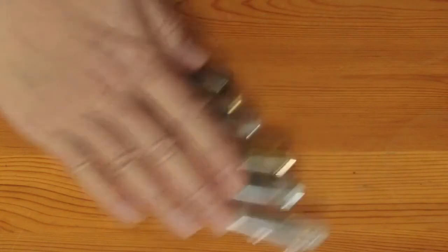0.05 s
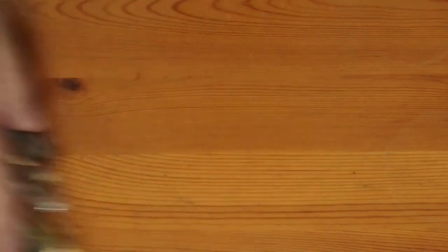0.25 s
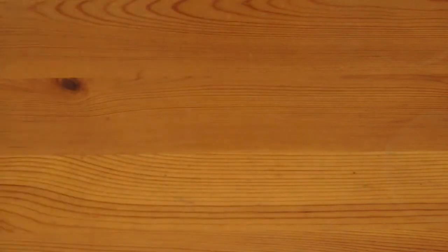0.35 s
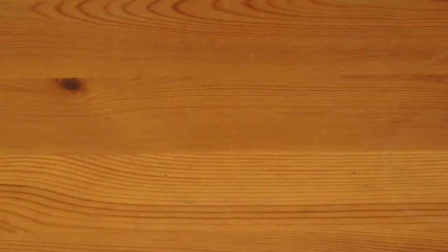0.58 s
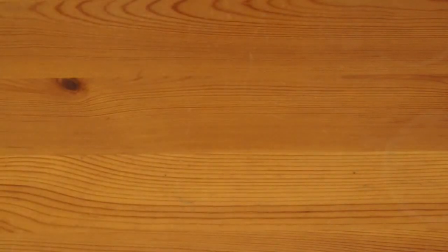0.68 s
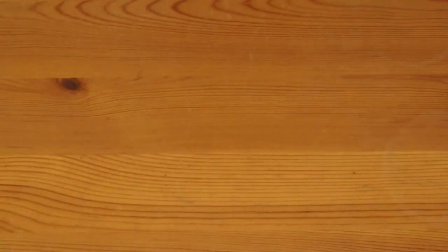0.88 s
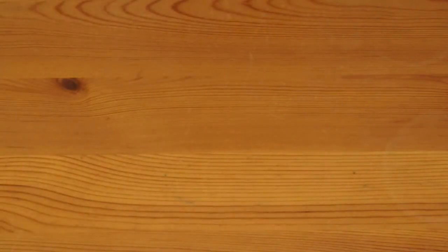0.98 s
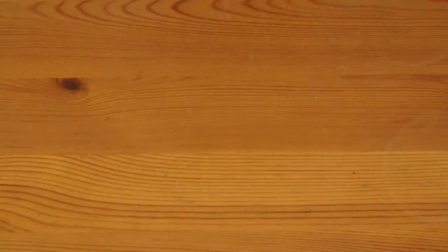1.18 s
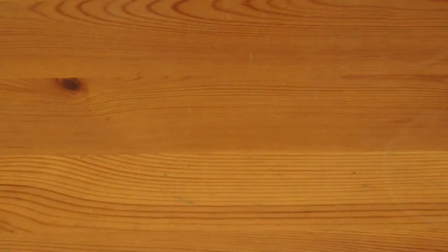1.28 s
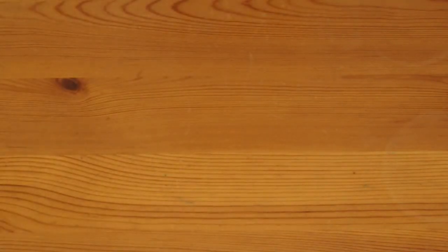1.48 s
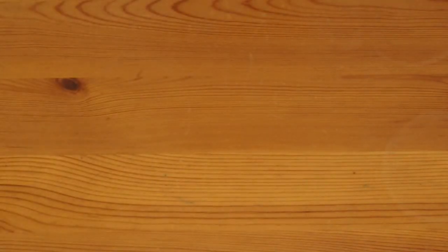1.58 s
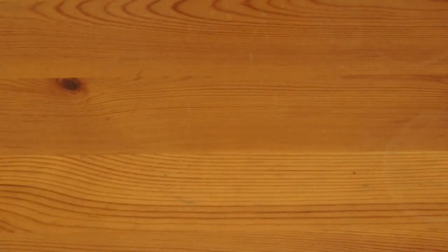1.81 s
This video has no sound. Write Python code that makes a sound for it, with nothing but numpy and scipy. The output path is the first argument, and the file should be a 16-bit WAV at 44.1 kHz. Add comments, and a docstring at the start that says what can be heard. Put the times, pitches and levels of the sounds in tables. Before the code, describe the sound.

Hard plastic pens slide across a wooden table with a hollow, raspy scrape, clatter together in a quick burst of clicks, then settle with faint taps; close stereo microphone in a small quiet room.

```python
"""In a small room, close by, a hand sweeps a row of plastic pens across a wooden table.
Dense random slips ring filters for tabletop drone, barrel rasp and hiss; sparser jolts add scratches.
Bunching pens click and rattle: sharp contacts with short noise tails and ringing notes, or random impulses.
Decaying sines make the settling knocks, pen rings and hand bumps; shaped noise makes the room tone."""
import sys
import numpy as np
from scipy import signal
from scipy.fft import rfft, irfft, next_fast_len
from scipy.io import wavfile
from scipy.ndimage import uniform_filter1d, map_coordinates

SR = 44100
rng = np.random.default_rng(int(sys.argv[2]) if len(sys.argv) > 2 else 0)


def generate_wav(sig):
    """Save sig (samples, or channels by samples) to the path in sys.argv[1] as 16-bit PCM at SR."""
    pcm = np.round(np.clip(np.atleast_2d(sig).T, -1, 1) * 32767).astype(np.int16)
    wavfile.write(sys.argv[1], SR, pcm)


N = 81585

# Higher tabletop modes. Each row: centre in Hz, width in Hz, gain in dB before colouring.
TABLETOP_MODES = [(360, 31, -4.5), (439.3, 48, -2.5), (487.7, 26, -1.5), (562, 32, -1.5), (655.4, 46, -1.5),
                  (755.8, 22, 2), (879, 30, 2), (928.4, 14, 1.5), (1004.6, 38, -2), (1094.4, 34, -0.5),
                  (1219, 112, -1), (1255, 37, -1), (1352, 20, -2)]
# Colour of the barrels' rasp. Each row: frequency in Hz, gain in dB.
RASP_COLOUR = [(60, -16), (200, -14.5), (700, -6.5), (1300, 0), (1900, -2), (2600, 2.5), (3500, -1.5),
               (5000, -0.5), (7000, -11.5), (11000, -43.5)]
CLICK_ROOM_DB, KNOCK_ROOM_DB = -10, -20
TAP_ATTACK_S = 0.004  # time constant, knocks and pings


def amp(db):
    """Decibels to gain."""
    return 10 ** (np.asarray(db) / 20)


def unit(x):
    """Scale to rms 1."""
    return x / np.sqrt(np.mean(x ** 2) + 1e-20)


def seconds(length):
    """Time axis in seconds for a length in samples."""
    return np.arange(length) / SR


def grid():
    """Frequencies in Hz on which all full-length filters are drawn."""
    return np.fft.rfftfreq(2 * next_fast_len(N), 1 / SR)


def along(points, hz):
    """Read (Hz, value) points on a log frequency axis."""
    f, v = np.transpose(points)
    return np.interp(np.log(hz + 1), np.log(f + 1), v)


def envelope(points, left=None):
    """Gain over time from (s, dB) points; left is the dB ahead of the first."""
    return amp(np.interp(seconds(N), *np.transpose(points), left=left))


def filtered(x, response):
    """Apply a frequency response."""
    return irfft(rfft(x, 2 * next_fast_len(N)) * response)[..., :N]


def colour(points):
    """Minimum-phase response with the given (Hz, dB) shape, by folding the cepstrum."""
    cepstrum = irfft(np.log(amp(along(points, grid()))))
    half = len(cepstrum) // 2
    cepstrum[1:half] *= 2
    cepstrum[half + 1:] = 0
    return np.exp(rfft(cepstrum))


def resonances(modes, ratio):
    """Sum of band-pass modes, mode k weighted by ratio ** k; a negative ratio alternates polarity."""
    f = grid()
    total = 0
    for k, (centre, width, db) in enumerate(modes):
        damping = 1j * f * width
        total = total + ratio ** k * amp(db) * damping / (centre ** 2 - f ** 2 + damping)
    return total


def spread(pair, likeness):
    """Mix two unrelated signals into left and right with correlation given as (Hz, 0-1)."""
    turn = np.arccos(np.clip(along(likeness, grid()), -1, 1)) / 2
    mid, side = filtered(pair, np.array([np.cos(turn), np.sin(turn)]))
    return np.array([mid + side, mid - side])


def wobble(knots_per_s):
    """Smooth random curve through normally distributed knots."""
    return map_coordinates(rng.standard_normal(1024), [np.arange(N) * knots_per_s / SR], mode="wrap")


def add(track, s, sound):
    """Add a sound into the track at s seconds."""
    part = track[..., round(s * SR):][..., :sound.shape[-1]]
    part += sound[..., :part.shape[-1]]


def room(x):
    """Diffuse reverberation: decaying noise, independent left and right, faster or slower by frequency."""
    # Each row: frequency in Hz, t60 in s.
    decay = [(150, 0.12), (1000, 0.52), (4000, 0.17), (14000, .16)]
    hz, t, z = signal.stft(rng.standard_normal((2, SR // 2)), SR, nperseg=256)
    fade = amp(-60 * t / along(decay, hz)[:, None])
    tail = signal.istft(z * fade, SR, nperseg=256)[1]
    tail = tail / np.linalg.norm(tail[0])
    return signal.fftconvolve(np.atleast_2d(x), tail, axes=1)[:, :N]


def friction(response, judder_db):
    """Dense tiny slips of random size ring a body; their level judders. Output rms is 1."""
    # Left-right correlation. Each row: frequency in Hz, correlation 0-1.
    likeness = [(40, .5), (200, .93), (500, .9), (1000, .89), (3000, .84), (6000, .62), (12000, .3)]
    # Lean to the left. Each row: frequency in Hz, left over right in dB.
    lean = [(250, -1.9), (550, 0.94), (1200, 0.23), (3500, -1), (8000, 2), (13000, 1.5)]
    slips_per_s, slip_spread_db = 14000, 2.5
    size_db = slip_spread_db * rng.standard_normal(N) + judder_db * wobble(140)
    slips = (rng.random(N) < slips_per_s / SR) * amp(size_db)
    sound = filtered(spread(slips * rng.standard_normal((2, N)), likeness), response)
    half_lean_db = along(lean, grid()) / 2
    return unit(filtered(sound, amp([half_lean_db, -half_lean_db])))


def patchy(x):
    """Resonances come and go as pens turn under the hand: random gain over time and frequency, rms 1."""
    patch_db = 3.2  # rms
    z = signal.stft(x, nperseg=512)[2]
    field = rng.standard_normal(z.shape[1:])
    field = uniform_filter1d(field, size=3, axis=0)  # frequency bins
    field = uniform_filter1d(field, size=10, axis=1)  # time frames
    return unit(signal.istft(z * amp(patch_db * unit(field)), nperseg=512)[1][:, :N])


def room_tone():
    """Faint steady hiss over a rumble that drifts unevenly, both from shaped stereo noise."""
    # Each row: frequency in Hz, gain in dB.
    tone_colour = [(25, -28), (55, -7.5), (90, -2.5), (125, 4), (175, -8), (240, -6.5), (350, -9.5),
                   (600, -13), (1000, -12), (2000, -18), (4300, -17.5), (8000, -25), (15000, -21)]
    tone_db, drift_db = -60.5, 2
    likeness = [(30, 0.52), (120, 0.79), (600, 0.34), (4000, 0.023)]
    air = spread(rng.standard_normal((2, N)), likeness)
    tone = unit(filtered(air, colour(tone_colour)))
    rumble = filtered(tone, 1 / (1 + (grid() / 1500) ** 2))
    hiss = tone - rumble
    return amp(tone_db) * (hiss + rumble * amp(drift_db * (wobble(9) - .5)))


def bumps():
    """The hand pushes the table into a short low thud: one decaying sine per bump."""
    # Each row: start in seconds, level in dB.
    bump_times = [(0.619, -33.5), (0.698, -44), (0.749, -47), (1.162, -53)]
    bump_hz, t60_s = 116, 0.062
    out, t = np.zeros(N), seconds(SR // 4)
    for s, db in bump_times:
        add(out, s, amp(db - 60 * t / t60_s) * np.sin(2 * np.pi * bump_hz * t))
    return out


def knocks():
    """A rocking pen taps the tabletop: decaying modes, randomly detuned and weighted per tap."""
    # Each row: start in seconds, gain in dB.
    knock_times = [(.648, -26), (.706, -22.5), (.850, -33.5), (0.929, -38.5), (.962, -40.5), (1.007, -37.5),
                   (1.060, -36), (1.124, -31.5), (1.153, -28.5), (1.248, -23.5), (1.270, -25.5),
                   (1.328, -32), (1.340, -33)]
    # Each row: frequency in Hz, level in dB, t60 in s.
    knock_modes = [(265, -14.5, 0.051), (418, -16, 0.026), (540.2, 3, 0.049), (592, -10.5, 0.041),
                   (793, -29, 0.039), (1229, -13.5, 0.042), (1728, -17, 0.046)]
    detune, level_spread_db = 0.015, 2.16  # standard deviations, detune as a fraction
    out, t = np.zeros(N), seconds(SR // 5)
    attack = (1 - np.exp(-t / TAP_ATTACK_S)) ** 2
    for s, db in knock_times:
        ring = np.zeros(len(t))
        for hz, level_db, t60_s in knock_modes:
            decay = amp(level_db + rng.normal(0, level_spread_db) - 60 * t / t60_s)
            ring += decay * np.sin(2 * np.pi * hz * (1 + detune * rng.normal()) * t)
        add(out, s, amp(db) * ring * attack)
    direct = out * amp([[1], [-1]])  # leans 2 dB to the left
    return direct + amp(KNOCK_ROOM_DB) * room(out)


def pings():
    """A barrel free of the hand rings on after a contact: decaying modes at random phase."""
    # Each row: start in seconds, gain in dB.
    ping_times = [(0.845, -38), (1.007, -47), (1.177, -43)]
    # Each row: frequency in Hz, level in dB, t60 in s.
    pen_modes = [(387, 0, 0.072), (798, 2, 0.062), (1235, -5, 0.11), (1667, -0.5, 0.066),
                 (2000, -15, 0.072), (4030, 1.5, 0.042), (8200, -14.5, .07)]
    out, t = np.zeros(N), seconds(SR // 5)
    attack = 1 - np.exp(-t / TAP_ATTACK_S)
    for s, db in ping_times:
        ring = np.zeros(len(t))
        for hz, level_db, t60_s in pen_modes:
            decay = amp(level_db + rng.normal() - 60 * t / t60_s)
            ring += decay * np.sin(2 * np.pi * (hz * t + rng.random()))
        add(out, s, amp(db) * ring * attack)
    return out + amp(KNOCK_ROOM_DB) * room(out)


def rattle(plastic):
    """Clusters of small random contacts between bunched pens and wood: impulses through both bodies."""
    # Each row: first second, last second, gain in dB.
    clusters = [(0.639, 0.742, -16), (0.784, 0.853, -27), (1.166, 1.197, -30.5), (1.249, 1.297, -42)]
    # Each row: frequency in Hz, gain in dB.
    rattle_colour = [(100, -28), (600, -3), (1800, 3.5), (4000, -3), (8000, -8.5), (15000, -32)]
    hits_per_s, spread_db = 350, 3.5
    hits = np.zeros((2, N))
    for first, last, db in clusters:
        for s in np.arange(first, last, 1 / hits_per_s):
            late, size, place, push = rng.uniform(-1, 1, size=4)
            gain = np.sign(push) * amp(db + spread_db * size)
            pan = 1 + place * np.array([[.5], [-.5]])
            add(hits, s + late / hits_per_s, gain * pan)
    wood = 1 + resonances(TABLETOP_MODES, -1.105)
    out = filtered(hits, plastic * wood * colour(rattle_colour))
    return out + amp(CLICK_ROOM_DB) * room(out)


def clicks(plastic):
    """Pens collide: a sharp contact, milliseconds of noisy chatter and one briefly ringing note."""
    # Each row: start in seconds, contact gain in dB at the four click bands ahead of the barrel modes,
    # left over right in dB, note in Hz, note level in dB.
    collisions = [(0.5455, -15, -7, -8.5, -41, 0, 3514, -9), (0.5484, -11, -9, -1.5, -20, 7.5, 8300, -23),
                  (.6030, -28, -16, -30, -25, 13, 4500, -25), (0.6107, -14, -9, -11, -7, 5.5, 12900, -38),
                  (0.6128, -22, -10, -27, -31, -7, 4920, -27),
                  (0.6342, -12, -12, -13, -11, 7.5, 13000, -16.5),
                  (0.64, -17, -15.5, -7, -15, 5, 7800, -28),
                  (0.6462, -7, -11.5, -17.5, -16, 0, 7570, -23.5),
                  (0.6961, -35, -12.5, -14.5, -20, 5, 12900, -27),
                  (0.7065, -3, -16.5, -29, -38, -1, 1710, -21), (0.7263, -4, -14.5, -40, -53, 1, 1720, -22),
                  (0.7595, -9, -7.5, -6.5, -20, 3, 4570, -25),
                  (1.1448, -26, -25, -28.5, -48, 5.5, 2370, -32),
                  (1.1676, -41, -25, -43, -33, 12, 1842, -37.5), (1.1820, -28, -24, -38, -42, 0, 1990, -33),
                  (1.1758, -19, -21.5, -23.5, -32, 5.5, 3970, -26),
                  (1.1790, -41, -13.5, -24.5, -55, 3, 1810, -24.5),
                  (1.1988, -48, -26, -33, -51, -1, 3860, -49), (1.2466, -11.5, -34, -55, -55, 2, 1750, -29),
                  (1.2604, -24, -28, -33, -48, 2, 3800, -48),
                  (1.2757, -16.5, -45, -33.5, -63, 5.5, 6260, -42),
                  (1.342, -38, -37.5, -44.5, -70, -1, 5730, -50)]
    bands_hz = (1000, 3500, 8000, 13000)  # the four click bands in Hz
    chatter_gain, chatter_t60_s, ring_t60_s = 2.12, 0.016, 0.013
    width, dispersion_s, note_room_db = 1.2, 0.000874, -18.5
    hits, notes, t = np.zeros((2, N)), np.zeros((2, N)), seconds(SR // 20)
    for s, *bands_db, pan_db, note_hz, note_db in collisions:
        pan = amp([[pan_db / 2], [-pan_db / 2]])
        chatter = rng.standard_normal((2, len(t))) * amp(-60 * t / chatter_t60_s)
        contact = chatter_gain * chatter / np.linalg.norm(chatter[0])  # rows: mid, side
        contact[0, 0] += 1
        lows = [(60, bands_db[0] - 42), (300, bands_db[0] - 10)]
        shape = [*lows, *zip(bands_hz, bands_db), (16000, bands_db[-1] - 5)]
        impulse = irfft(colour(shape))[None, :len(t)]
        mid, side = signal.fftconvolve(contact, impulse, axes=1)
        side = width * np.diff(side, prepend=0) / 2  # sides differ mostly in the treble
        add(hits, s, pan * np.array([mid + side, mid - side]))
        attack = (1 - np.exp(-note_hz * t)) ** 2
        note = amp(note_db - 60 * t / ring_t60_s) * np.sin(2 * np.pi * note_hz * t) * attack
        add(notes, s, pan * note)
    # bending waves: lows arrive later
    dispersion = np.exp(-2j * np.pi * dispersion_s * grid() * (1 - grid() / SR))
    out = filtered(hits, plastic * dispersion)
    return out + notes + room(amp(CLICK_ROOM_DB) * out + amp(note_room_db) * notes)


def drag():
    """Sustained rubbing excites the tabletop's hollow middle modes near 540 Hz."""
    # Each row: time in seconds, level in dB.
    drag_level = [(.42, -70), (.5, -36), (0.601, -31.5), (.7, -35.5), (.8, -59.5), (.92, -56.5), (1.0, -77),
                  (1.1, -57), (1.17, -44.5), (1.22, -56), (1.27, -43), (1.31, -75), (1.38, -99)]
    # Each row: centre in Hz, width in Hz, gain in dB before colouring.
    drag_modes = [(514.2, 21, -6), (547, 15, -0.5)]
    # Each row: frequency in Hz, gain in dB.
    drag_colour = [(200, -31.5), (450, -2), (620, -3.5), (1400, -25)]
    body = resonances(drag_modes, -0.91) * colour(drag_colour)
    return envelope(drag_level, left=-120) * friction(body, judder_db=2.5)


def free_slide():
    """Before they bunch up, loosely held barrels ring brightly as they rub."""
    # Each row: time in seconds, level in dB.
    slide_level = [(.1, -75), (.17, -52), (.225, -42), (.28, -40), (.38, -45), (.5, -56), (.6, -90)]
    # Each row: centre in Hz, width in Hz, gain in dB before colouring.
    free_modes = [(1910, 60, -14.5), (3436, 89, 5), (3720, 38, 4), (4440, 120, -3)]
    body = resonances(free_modes, 1) * colour(RASP_COLOUR)
    return envelope(slide_level) * patchy(friction(body, judder_db=0.0))


def catches(plastic):
    """Pens catch on the grain: separate scratches jolt wood and barrel at once. Output rms is 1."""
    # Each row: frequency in Hz, gain in dB.
    catch_colour = [(150, -23), (500, -4.5), (1000, 1.5), (3000, -2), (5500, -2), (15000, -33)]
    catches_per_s, spread_db = 330, 4
    size = amp(spread_db * np.clip(rng.standard_normal(N), -2, 1))
    jolts = (rng.random(N) < catches_per_s / SR) * size * np.sign(rng.standard_normal(N))
    place = rng.random(N) - .5
    body = plastic * (1 + resonances(TABLETOP_MODES, -1.07)) * colour(catch_colour)
    return unit(filtered(jolts * np.array([1 + place, 1 - place]), body))


def scrape(plastic):
    """Sliding pens drive the tabletop's boom and drone, rasp in their barrels and hiss at the contact."""
    # Each row: time in seconds, drone level in dB, rasp reference level in dB, hiss level in dB.
    sweep = [(0, -64, -69.5, -85), (0.108, -70, -76, -75), (0.161, -45, -59.5, -59.5),
             (.195, -42.5, -48, -59), (0.254, -36, -39.5, -48.5), (.39, -34, -40, -40),
             (.45, -29.5, -36, -40.5), (0.522, -30.5, -36, -39), (0.592, -30.5, -42, -45),
             (.645, -33, -36.5, -46), (0.689, -37.5, -41.5, -39.5), (0.734, -37, -49.5, -72),
             (0.791, -44, -42, -45.5), (.82, -52, -54.5, -55.5), (.86, -51.5, -49, -67),
             (0.899, -54.5, -59, -61.5), (.99, -65, -71.5, -77), (1.089, -59, -65.5, -70),
             (1.14, -50, -60.5, -62), (1.181, -43.5, -48.5, -78), (1.223, -58.5, -60, -66),
             (1.269, -47, -52.5, -64), (1.31, -55.5, -61, -70), (1.38, -84, -68, -81),
             (1.6, -85, -101, -100)]
    # Level of the lowest modes. Each row: time in seconds, level in dB.
    boom_level = [(.1, -70), (.16, -56.5), (.2, -47), (.245, -33), (.3, -38.5), (.41, -41), (.5, -38.5),
                  (.63, -35.5), (.71, -34), (.76, -49), (.82, -58), (.86, -58.5), (.99, -64.5), (1.1, -74),
                  (1.14, -45.5), (1.21, -59), (1.27, -54.5), (1.37, -76), (1.5, -63.5), (1.56, -86)]
    # Lowest tabletop modes. Each row: centre in Hz, width in Hz, gain in dB before colouring.
    low_modes = [(226, 22, -1), (261.8, 18.4, 1), (299, 21, -4.5)]
    # Colours. Each row: frequency in Hz, gain in dB.
    boom_colour = [(60, -44.5), (120, -7), (175, 5), (215, -1), (320, 7), (700, -22)]
    drone_colour = [(40, -44), (130, -24), (215, 6.5), (400, 7), (1000, -1), (1500, -6.5), (2500, 10.5),
                    (6000, -14)]
    hiss_colour = [(300, -41), (2500, 0.5), (5000, 0), (6500, 5.5), (8000, 0), (10500, 0), (12500, -10),
                   (14500, -5), (16000, -39)]
    smooth_db, catch_db = -2.0, -3  # against the rasp reference level
    s, *levels_db = np.transpose(sweep)
    drone_gain, rasp_gain, hiss_gain = [amp(np.interp(seconds(N), s, db)) for db in levels_db]
    boom = friction(resonances(low_modes, -1.025) * colour(boom_colour), judder_db=-1)
    drone = friction(resonances(TABLETOP_MODES, -1.03) * colour(drone_colour), judder_db=2.5)
    smooth = patchy(friction(plastic * colour(RASP_COLOUR), judder_db=1))
    rasp = amp(smooth_db) * smooth + amp(catch_db) * catches(plastic)
    hiss = patchy(friction(plastic * colour(hiss_colour), judder_db=1.1))
    return envelope(boom_level) * boom + drone_gain * drone + rasp_gain * rasp + hiss_gain * hiss


def scene():
    """The sweep, the collisions and the settling taps in a quiet room."""
    # Pen barrel modes. Each row: centre in Hz, width in Hz, gain in dB before the mode weighting.
    barrel_modes = [(1727, 60, 7.5), (1873, 43, 8), (2005, 55, 11.5), (2830, 160, 1), (3530, 72, 1),
                    (3707, 90, 7.5), (3910, 66, 10), (8030, 170, 7.5), (12460, 350, 11), (14500, 730, 6)]
    plastic = 1 + resonances(barrel_modes, 0.89)
    background = room_tone()
    settling = bumps() + knocks() + pings()
    collisions = rattle(plastic) + clicks(plastic)
    sliding = drag() + free_slide() + scrape(plastic)
    return background + settling + collisions + sliding


def record(dry):
    """Steep zero-phase low-pass at the band limit."""
    top_hz = 15700
    return filtered(dry, 1 / (1 + (grid() / top_hz) ** 120))


dry = scene()
out = record(dry)
generate_wav(out)
```